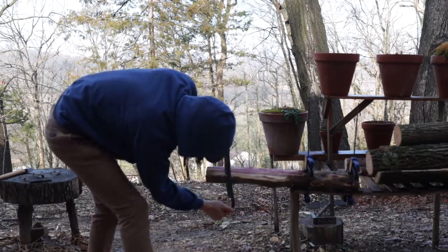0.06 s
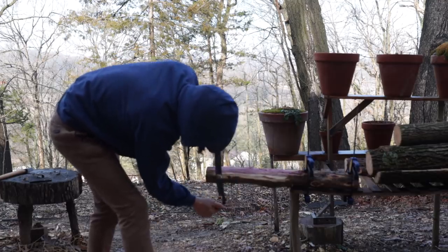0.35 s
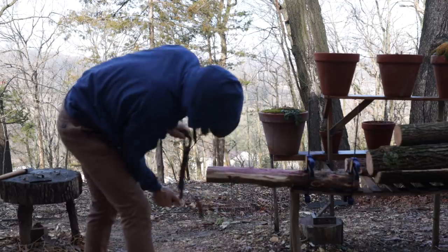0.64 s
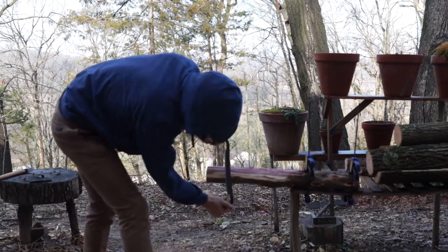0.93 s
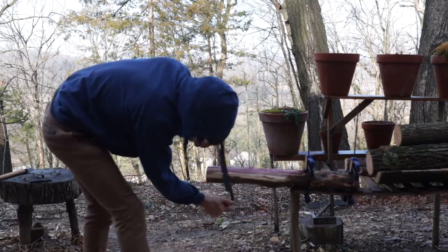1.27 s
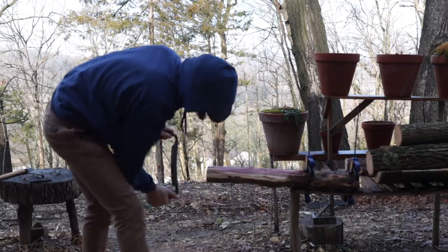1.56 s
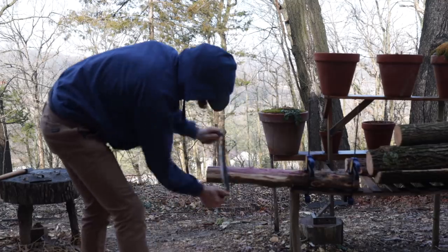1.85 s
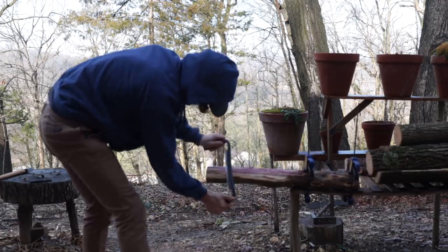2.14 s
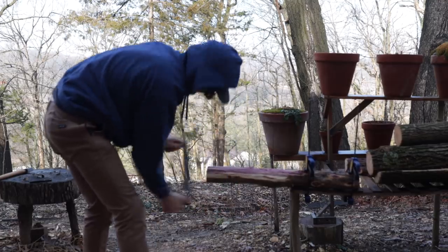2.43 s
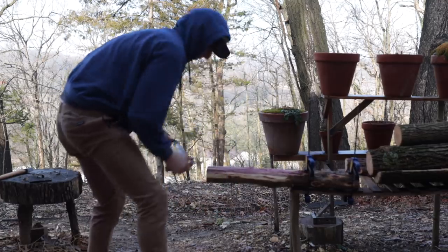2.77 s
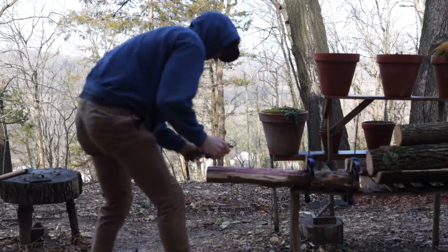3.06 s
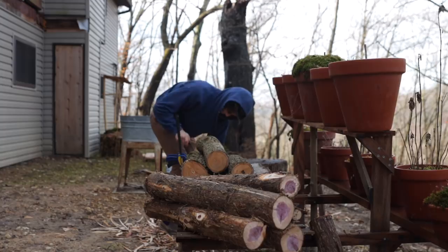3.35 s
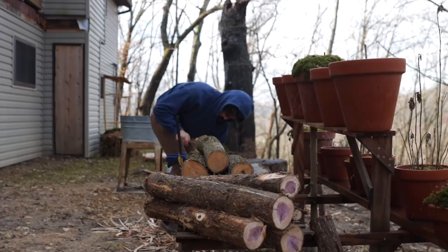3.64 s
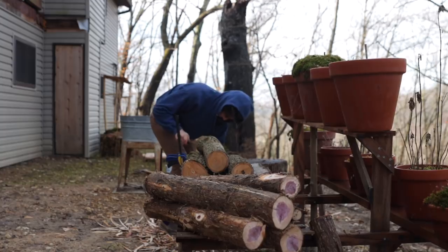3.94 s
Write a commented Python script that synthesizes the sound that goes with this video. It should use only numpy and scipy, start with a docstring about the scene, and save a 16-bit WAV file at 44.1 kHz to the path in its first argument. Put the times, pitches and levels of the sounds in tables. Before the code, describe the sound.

Three short rasping blade strokes shave wood outdoors, then feet shuffle in dry leaves.

```python
"""Wind and far traffic rumble in a wooded yard, and a distant engine hums. In the first 2.5 seconds a
drawknife is pulled along a log three times: the wood rasps, the steel blade rings, fibres tear and the
shaving snaps off. Between pulls, wood knocks and small birds whistle. Then feet shuffle in dry leaves and
crack twigs. At 3.3 seconds the scene moves to a log pile: the rumble drops, the hum stops, and a few
last whistles, scuffs and knocks follow."""
import sys
import numpy as np
from scipy import signal
from scipy.fft import rfft, irfft
from scipy.io import wavfile
from scipy.ndimage import uniform_filter1d, map_coordinates

SR = 44100
rng = np.random.default_rng(int(sys.argv[2]) if len(sys.argv) > 2 else 0)


def master(y):
    """Save y as 16-bit WAV."""
    cut = np.clip(np.atleast_2d(y).T, -1, 1)
    pcm = np.round(cut * 32767)  # scale
    wavfile.write(sys.argv[1], SR, pcm.astype(np.int16))


N = 176400  # 4 seconds

# Wind and traffic at the bench and at the log pile. Each row: frequency in Hz, relative level in dB.
BENCH_RUMBLE = [(15, -38), (25, -19), (42, 2.5), (70, -0.5), (110, 3.5), (200, -0.5), (400, -8),
                (650, -7.5), (900, -10.5), (1250, -22), (1750, -29.5), (2700, -38.5), (4000, -40.5),
                (7000, -43.5), (16000, -47)]
PILE_RUMBLE = [(25, -20), (70, 4), (160, -3), (250, -2), (373, -11), (550, -10.5), (887, -15.5),
               (1650, -27), (2300, -34.5), (5880, -40), (16000, -46)]
# The engine. Each row: time in seconds, firing rate in Hz, levels in dB at 2 and 3 times that rate.
ENGINE_HUM = [(0, 52.43, -41, -75), (.6, 52.4, -42, -43.5), (1.3, 53.2, -51, -44), (2.0, 53.83, -42, -38.5),
              (2.7, 54.1, -43, -41), (3.28, 52.42, -42, -43), (3.33, 52.7, -54, -65)]
# A faint rustle. Each row: time in seconds, level in dB.
RUSTLE_LEVELS = [(0, -63), (.6, -61), (.8, -59), (1.06, -61), (1.13, -74), (1.3, -78)]
# Bird calls. Each row: start and length in seconds, first and last pitch in Hz, relative level in dB.
WHISTLES = [(0.568, .14, 7850, 8700, -65.5), (0.7, 0.124, 7520, 7520, -63), (0.798, 0.031, 7650, 6265, -60),
            (0.864, 0.066, 6150, 5900, -67), (0.957, .09, 6150, 5800, -69), (.975, .06, 5300, 5070, -71),
            (1.303, .032, 9200, 7350, -60), (3.327, 0.072, 8820, 7500, -56), (3.731, .024, 6700, 6000, -62)]
# Shoes and logs in leaves. Each row: start and length in seconds, level in dB, treble boost in dB.
SCUFFS = [(1.556, .11, -53, -17), (1.837, 0.011, -45, -5), (2.576, 0.069, -43.5, -2.5),
          (2.65, 0.07, -44, -6), (2.71, .28, -52, -5), (3.021, 0.088, -42.5, 1), (3.109, 0.095, -49, -5.5),
          (3.209, 0.012, -49, 15), (3.227, 0.059, -46.5, -13), (3.299, .012, -51.5, 34),
          (3.548, .04, -49, -25), (3.822, .03, -45, -23)]
# Twigs underfoot. Each row: start in seconds, peak level in dB, treble lift in dB per octave.
TWIG_CRACKS = [(2.592, -25.5, 12), (2.6866, -23.5, 0), (2.7012, -27, 6), (2.7067, -16, -8),
               (2.7842, -29.5, 12), (3.8825, -31, 2)]
# The tones of a twig and of the blade. Each row: pitch in Hz, width in Hz, relative level in dB.
TWIG_TONES = [(920, 380, 8), (1770, 500, -3), (3360, 900, -15)]
BLADE_TONES = [(1987, 26, 0.5), (2043, 140, 0), (2765, 180, -5), (2880, 130, -9), (4006, 200, -0.5),
               (4580, 200, 0.5), (5870, 100, 3), (6210, 140, 1.5), (6800, 180, -8), (7520, 130, -9)]
# Wood and tool knocking. Each row: start in seconds, level in dB, pitch in Hz, fade time in seconds,
# width as a share of the pitch.
KNOCKS = [(0.527, -34, 950, 0.0047, 0.45), (.5525, -23.5, 720, 0.0038, 0.37),
          (0.555, -42, 1800, 0.0062, 0.57), (0.925, -50.5, 4560, 0.0095, 0.82),
          (1.186, -39, 560, .012, 0.13), (1.185, -48.5, 2583, 0.0095, 0.94), (1.493, -37, 3120, .008, 0.11),
          (1.501, -36.5, 2010, 0.012, 0.08), (1.843, -43.5, 2600, 0.0056, 0.15),
          (2.102, -44, 2590, 0.0075, 0.12), (2.436, -33, 718, 0.012, 1), (2.439, -34.5, 1860, 0.0075, 0.33),
          (2.468, -32, 700, 0.012, 1), (2.953, -48.5, 5800, 0.0048, 0.51), (3.283, -39, 684, 0.0089, 0.31),
          (3.662, -46.5, 4370, 0.0048, 0.26), (3.838, -38.5, 740, .014, 0.49),
          (3.882, -35, 1770, 0.004, 0.85)]
# Splinters breaking. Each row: start in seconds, relative levels of crack and splintering in dB,
# fade time in seconds, pitch in Hz.
SNAPS = [(.016, -33, -43, .002, 13100), (0.168, -33, -40, 0.0022, 12000), (.075, -31, -42, 0.0022, 11000),
         (0.2163, -20, -38.5, 0.0018, 6000), (0.245, -28, -31.5, 0.005, 12200),
         (0.266, -22, -38, .002, 12000), (.308, -30, -26.5, 0.0015, 13100), (.464, -18, -30, .002, 10000),
         (0.5186, -24, -25, 0.0043, 5000), (0.525, -20, -27.5, 0.0022, 10000),
         (1.4785, -26, -25, .003, 9900), (1.4935, -19, -41, 0.0025, 5650), (1.504, -25, -39, .003, 5000),
         (1.8416, -31, -44, .002, 6990), (1.847, -38, -45, 0.0026, 4500), (2.2834, -16, -32.5, .0025, 9500),
         (2.4103, -19, -25, 0.0042, 7460), (2.4338, -4, -19, 0.0051, 7440)]
# The tone colour of four noises. Each row: frequency in Hz, relative level in dB.
RUSTLE_COLOUR = [(1000, -14), (2500, 8.5), (3400, -3.5), (6200, -2.5), (8000, -11), (16000, -23)]
LEAF_COLOUR = [(300, -38), (700, 8.5), (1200, -2), (2300, -4), (4000, -6.5), (7000, -10), (11000, -10),
               (16000, -17)]
TEAR_COLOUR = [(1000, -21), (3000, -16), (5000, -8), (7500, -10), (10000, -2), (12000, -2.5), (14000, -3.5)]
RASP_COLOUR = [(400, -3), (800, 14.5), (1400, 2.5), (2400, -2.5), (5000, -6), (7000, 0.5), (10000, -5),
               (16000, -33)]
# Fibres of each thickness crack at their own pitch. Each entry: pitch in Hz.
FIBRE_PITCHES = [3260, 4620, 6600, 8150, 10300, 11840, 14800]
# One shaving per pull. Each row: time it breaks in seconds, its pitch by then in Hz, boost at that
# pitch in dB, treble lift in dB per octave.
SHAVINGS = [(.5, 5240, 4.5, -1.5), (1.5, 9000, 4, -1), (2.43, 7600, 5, -0.5)]
# One table per pull. Each row: time in seconds, relative levels of rubbing and of tearing in dB.
PULLS = [
    [(0, -73, -66), (.08, -52.5, -52), (.125, -66, -68), (.17, -62, -57), (.245, -53, -50.5),
     (.295, -60, -56), (.335, -52, -45.5), (.465, -44.5, -42), (.51, -46.5, -48), (.55, -46.5, -60),
     (.575, -66, -80)],
    [(1.25, -65, -85), (1.345, -56.5, -73), (1.365, -50, -52), (1.39, -45.5, -62.5), (1.403, -46.5, -44),
     (1.435, -47.5, -52.5), (1.472, -45.5, -44), (1.497, -38.5, -38), (1.508, -40.5, -44),
     (1.518, -49, -69), (1.57, -61, -80)],
    [(2.15, -72, -85), (2.265, -52, -69), (2.322, -44, -51), (2.345, -45, -46), (2.364, -39.5, -35),
     (2.374, -41.5, -38), (2.395, -40, -51), (2.408, -39, -41), (2.425, -37, -46), (2.443, -32.5, -38),
     (2.452, -45, -59), (2.47, -38, -57.5), (2.484, -71, -76)],
]
# How freely the blade rings. One entry per pull: relative level in dB, then treble lift in dB per octave.
BLADE_RING_DB = [-2, -2, -2.5]
BLADE_TILT_DB = [-1, -5.5, -4.5]


def gain(db):
    """Turn decibels into a number to multiply by."""
    return 10 ** (np.asarray(db) / 20)


def unit(x):
    """Scale a signal to an average power of 1."""
    return x / np.sqrt(np.mean(x ** 2) + 1e-20)


def curve(rows, column, outside=-120):
    """Join the values of one table column with straight lines in time."""
    rows = np.array(rows, float)
    return np.interp(np.arange(N) / SR, rows[:, 0], rows[:, column], outside, outside)


def colour(x, points):
    """Turn the lows and highs of x up or down by a colour table, then scale to power 1."""
    hz, db = np.array(points, float).T
    bin_hz = np.maximum(np.arange(N // 2 + 1) * SR / N, 1)
    bin_db = np.interp(np.log(bin_hz), np.log(hz), db)
    return unit(irfft(rfft(x) * gain(bin_db), N))


def resonate(x, hz, width):
    """Let x ring at one pitch; the smaller the width in Hz, the longer it rings."""
    g, k = np.tan(np.pi * min(hz, .45 * SR) / SR), width / hz
    return signal.lfilter([g * k, 0, -g * k], [1 + g * k + g * g, 2 * (g * g - 1), 1 - g * k + g * g], x)


def wobble(per_s):
    """A smooth random wiggle of size about 1 that turns per_s times a second."""
    step = int(SR / per_s)
    stairs = np.repeat(rng.standard_normal(N // step + 1), step)
    return unit(uniform_filter1d(stairs, step)[:N])


def detune(x, share, per_s):
    """Let the pitch of x wander by a small share."""
    lag = signal.lfilter([1], [1, -np.exp(-per_s / SR)], share * wobble(per_s))
    return map_coordinates(x, [np.arange(N) + lag], mode="mirror")


def clicks(per_s, scatter_db):
    """Tiny random breaks of very unequal size."""
    chance = np.minimum(per_s / SR, 1)
    size = gain(scatter_db * np.minimum(rng.exponential(size=N), 4))
    return unit((rng.random(N) < chance) * size * rng.choice([-1, 1], N) / np.sqrt(chance))


def add(out, start, x):
    """Mix x into out at a start time in seconds."""
    i = int(np.clip(start * SR, 0, N - 1))
    out[i:i + len(x)] += x[:N - i]


def tree_echo(x, fade_s=0.65):
    """Trunks scatter the sound into a soft echo that falls 60 dB in fade_s."""
    t = np.arange(SR) / SR
    tail = rng.standard_normal(SR) * gain(-60 * t / fade_s) * np.minimum(t / .02, 1)
    return signal.fftconvolve(x, tail / np.linalg.norm(tail))[:N]


def rumble(move_s=3.3):
    """Wind and far traffic make a low noise, louder at the bench than at the log pile."""
    moved = np.clip((np.arange(N) / SR - move_s) * 100, 0, 1)
    bench = gain(-36) * colour(rng.standard_normal(N), BENCH_RUMBLE)
    pile = gain(-38.5) * colour(rng.standard_normal(N), PILE_RUMBLE)
    return np.sqrt(1 - moved) * bench + np.sqrt(moved) * pile


def engine():
    """A far engine hums unsteadily at two and three times its firing rate."""
    firing_hz = curve(ENGINE_HUM, column=1, outside=0) * (1 + 0.016 * wobble(14))
    phase = 2 * np.pi * np.cumsum(firing_hz) / SR
    return sum(gain(curve(ENGINE_HUM, column=k) + 1.15 * wobble(12)) * np.sin(k * phase) for k in (2, 3))


def rustle():
    """A faint hiss swells and fades during and just after the first pull."""
    return gain(curve(RUSTLE_LEVELS, column=1)) * colour(rng.standard_normal(N), RUSTLE_COLOUR)


def birds():
    """Thin, slightly hoarse whistles slide and level off, echoing among the trees."""
    out, waver = np.zeros(N), 1 + .017 * wobble(900)
    for start, length, from_hz, to_hz, db in WHISTLES:
        progress = np.linspace(0, 1, int(length * SR))
        hz = (to_hz + (from_hz - to_hz) * (1 - progress) ** 1.4) * waver[:len(progress)]
        swell = 2 * np.sqrt(2 * progress * (1 - progress))
        add(out, start, gain(db) * swell * np.sin(2 * np.pi * np.cumsum(hz) / SR))
    song = out * gain(3 * wobble(100))
    return song + gain(-4.5) * tree_echo(song)


def leaf_scuffs(rise_share=0.31, fade_s=.01, treble_hz=5000):
    """Dry leaves crackle, each at its own pitch, while a shoe or log slides over them."""
    t, out = np.arange(N) / SR, 0
    leaves = sum(resonate(clicks(1400, scatter_db=3.5), hz, hz / 2) for hz in np.geomspace(600, 14000, 10))
    crackle = colour(leaves, LEAF_COLOUR)
    low = signal.sosfiltfilt(signal.butter(1, treble_hz, fs=SR, output="sos"), crackle)
    for start, length, db, treble_db in SCUFFS:
        rise = np.clip((t - start) / (rise_share * length), 0, 1)
        fade = np.exp(-np.maximum(t - start - length, 0) / fade_s)
        out += gain(db) * rise * fade * unit(low + gain(treble_db) * (crackle - low))
    return out


def twigs():
    """A twig breaks in one clean click, and its hollow body rings very briefly."""
    out, click = np.zeros(N), signal.unit_impulse(SR // 20)
    for start, peak_db, tilt_db in TWIG_CRACKS:
        body = sum(gain(db + tilt_db * np.log2(hz)) * resonate(click, hz, width)
                   for hz, width, db in TWIG_TONES)
        add(out, start, gain(peak_db) * body / np.abs(body).max())
    return out


def knocks(rise_s=0.00072):
    """Wood and tool bump roughly, each time giving one dull tone that dies at once."""
    out, t = np.zeros(N), np.arange(SR // 10) / SR
    for start, db, hz, fade_s, width_share in KNOCKS:
        tone = resonate(rng.standard_normal(len(t)), hz, hz * width_share)
        body = unit(resonate(tone, hz, hz * 1.06))
        shape = np.sqrt(2) * (1 - np.exp(-t / rise_s)) * np.exp(-t / fade_s)
        add(out, start, gain(db) * shape * body)
    return out


def snaps():
    """Wood gives one sharp crack and splinters briefly; the jolt rings the blade."""
    out, t = np.zeros(N), np.arange(SR // 10) / SR
    click = signal.unit_impulse(len(t))
    for start, crack_db, splinter_db, fade_s, hz in SNAPS:
        crack = resonate(resonate(click, hz, hz * 1.4), hz, hz * 1.4)
        hiss = resonate(rng.standard_normal(len(t)), hz, width=hz)
        splinters = unit(resonate(hiss, hz, hz * 4)) * np.exp(-t / fade_s)
        add(out, start, gain(crack_db) * crack / np.abs(crack).max() + gain(splinter_db) * splinters)
    blade_ring = sum(gain(db) * resonate(out, hz, width) for hz, width, db in BLADE_TONES)
    return gain(-1.5) * out + gain(-5.5) * blade_ring


def tearing_fibres(fall_octaves_per_s=9, fastest_from_db=-44):
    """Fibres tear faster as the cut bites; the growing shaving rings lower and lower."""
    t, fibres = np.arange(N) / SR, 0
    levels = np.array([curve(pull, column=2) for pull in PULLS])
    tear_db, current_pull = levels.max(axis=0), levels.argmax(axis=0)
    break_s, break_hz, ring_db, tilt_db = np.array(SHAVINGS, float)[current_pull].T
    ring_octave = np.log2(break_hz) + np.minimum(fall_octaves_per_s * (break_s - t), 1)
    breaks_per_s = 1500 * np.clip(gain(tear_db - fastest_from_db), .1, 1)
    for hz in FIBRE_PITCHES:
        near_ring = np.exp(-(np.log2(hz) - ring_octave) ** 2)
        boost_db = tilt_db * np.log2(hz / np.median(FIBRE_PITCHES)) + ring_db * near_ring
        fibres += gain(boost_db) * resonate(clicks(breaks_per_s, scatter_db=5), hz, hz * 0.29)
    flutter = gain(1.5 * wobble(250))
    return gain(tear_db - 0.7) * colour(fibres * flutter, TEAR_COLOUR)


def drawknife():
    """The blade sticks and slips along the log, which rasps the wood and rings the steel."""
    slips = clicks(5500, scatter_db=3) * gain(0.5 * wobble(120))
    tones, out = [], 0
    for hz, width, db in BLADE_TONES:
        # The moving contact muffles and detunes each tone by turns.
        level = gain(db + 1.5 * wobble(25.14))
        tones.append((hz, level * detune(resonate(slips, hz, width), share=0.0037, per_s=35)))
    rasp = gain(-2) * colour(slips, RASP_COLOUR)
    for pull, ring_db, tilt_db in zip(PULLS, BLADE_RING_DB, BLADE_TILT_DB):
        blade = unit(sum(gain(tilt_db * np.log2(hz)) * tone for hz, tone in tones))
        out += gain(curve(pull, column=1)) * (rasp + gain(ring_db) * blade)
    return out


def scene():
    """Mix the work, its faint echo and the surroundings, the same on left and right."""
    work = drawknife() + tearing_fibres() + snaps() + knocks() + leaf_scuffs() + twigs()
    mono = work + gain(-26.5) * tree_echo(work) + birds() + rumble() + engine() + rustle()
    return np.array([mono, mono])


def record(dry):
    """Cut away the very highest treble, above 15900 Hz."""
    low_pass = signal.firwin(255, 15900, fs=SR)
    return signal.fftconvolve(dry, low_pass[None], mode="same", axes=1)


dry = scene()
out = record(dry)
master(out)
```